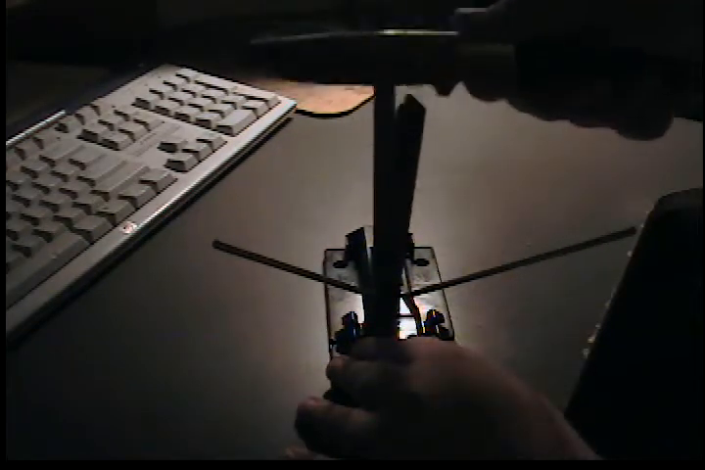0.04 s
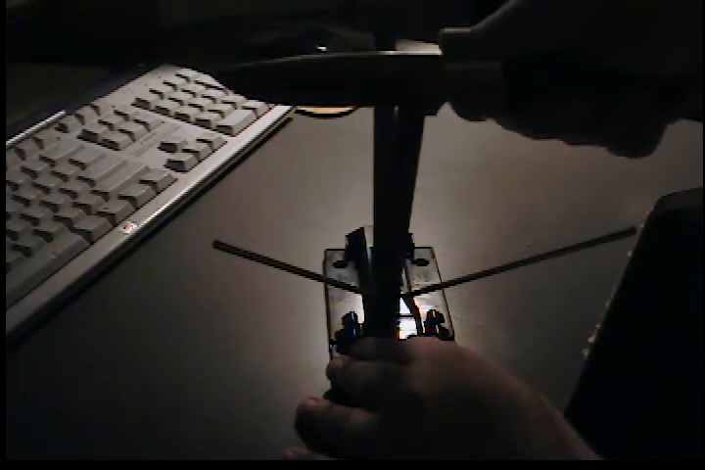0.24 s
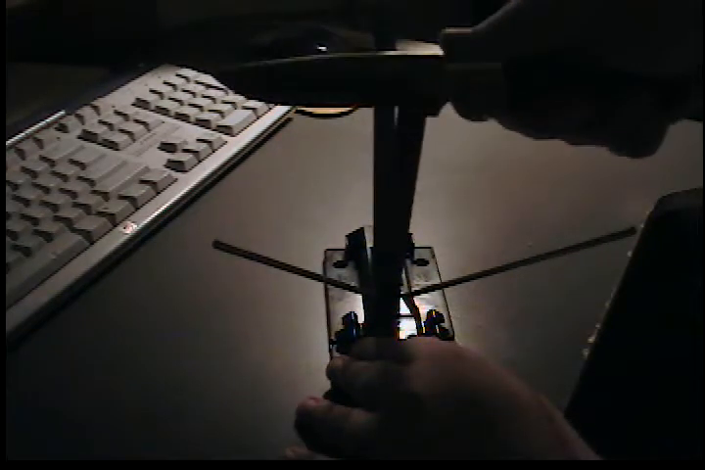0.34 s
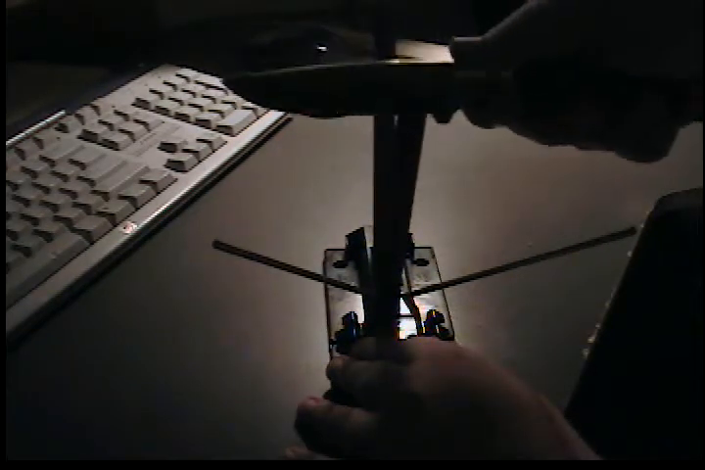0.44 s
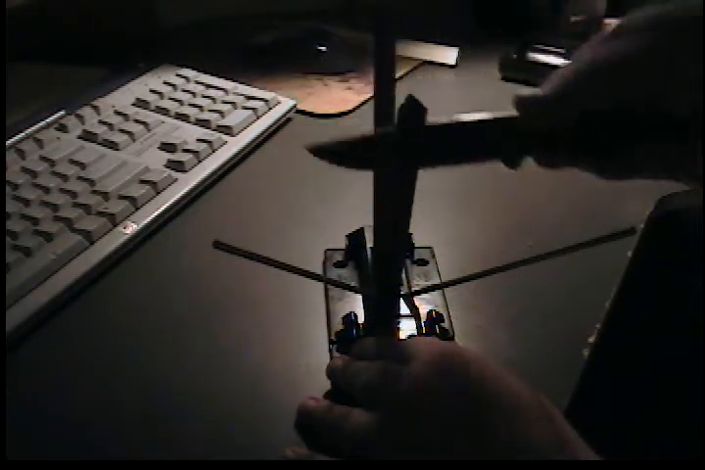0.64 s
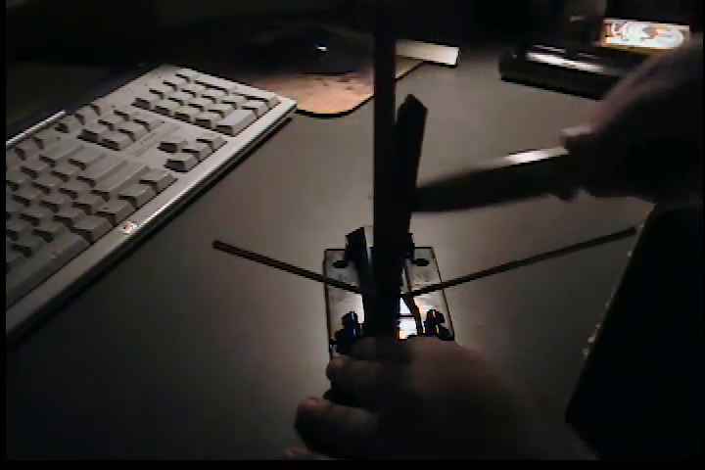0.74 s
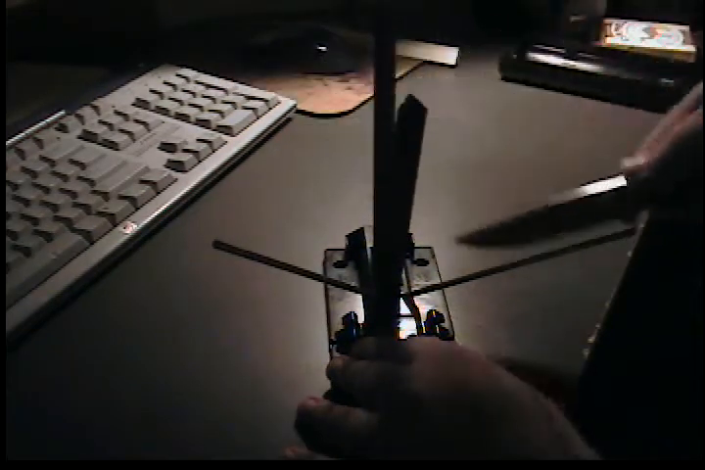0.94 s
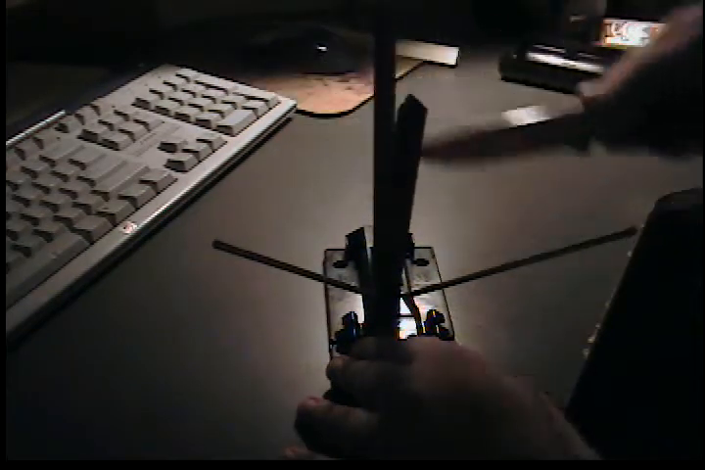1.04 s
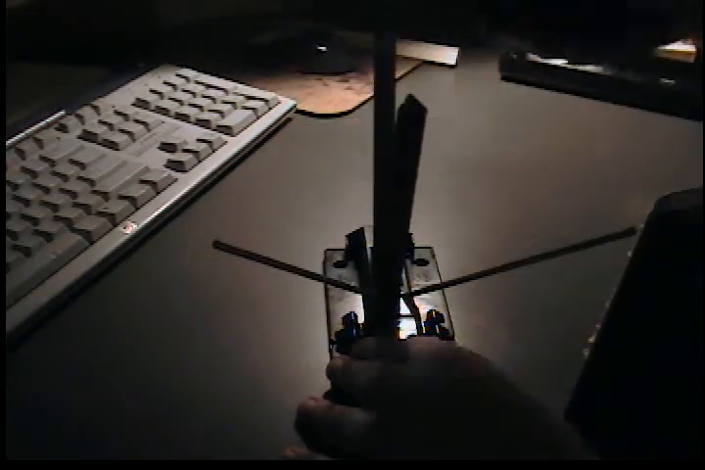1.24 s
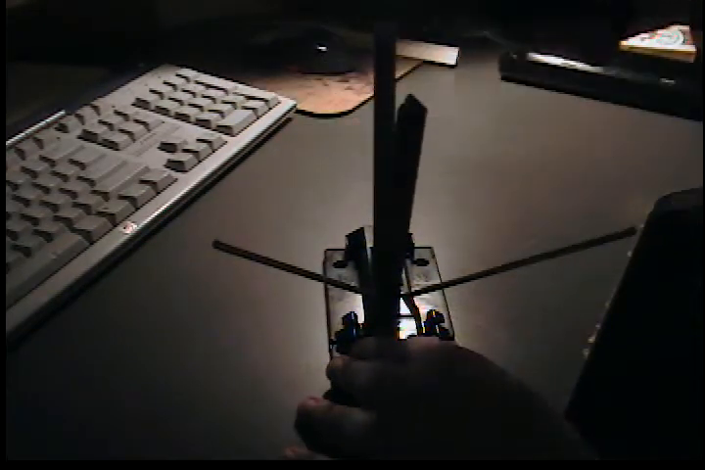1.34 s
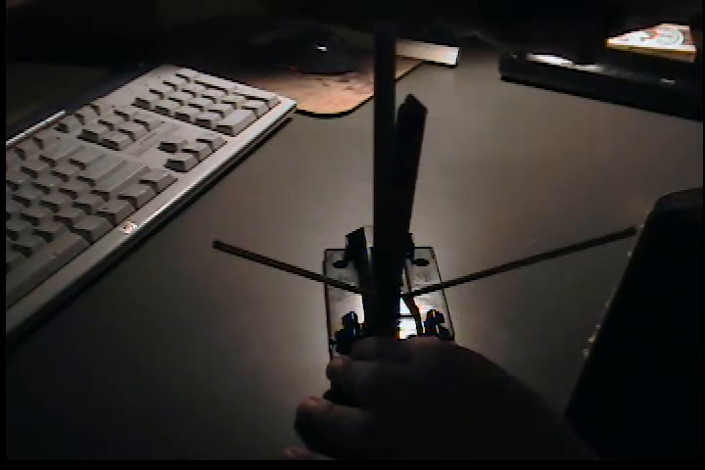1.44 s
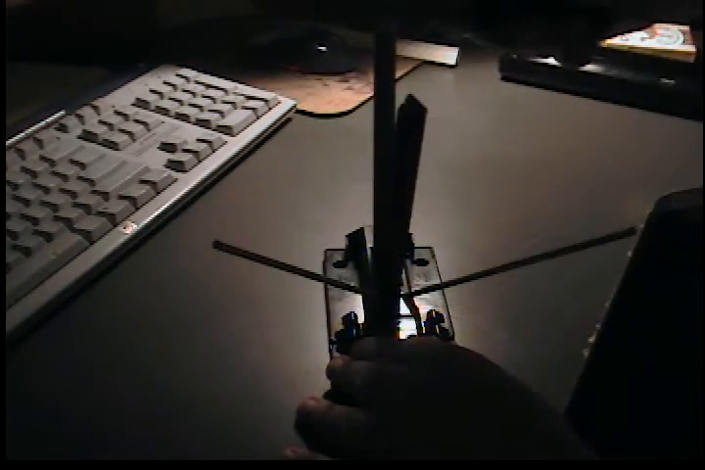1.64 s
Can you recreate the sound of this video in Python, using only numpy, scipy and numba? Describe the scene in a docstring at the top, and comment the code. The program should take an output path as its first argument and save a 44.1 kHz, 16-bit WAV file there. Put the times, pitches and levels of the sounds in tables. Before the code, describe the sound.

A knife blade scrapes once down a sharpening rod, rasping and ringing.

```python
"""A knife is drawn once down a sharpening rod held upright on a desk, in a small quiet room.
Friction on the rod's grain forces the steel to vibrate: a low rasp first, then hiss and brighter
ringing whose pitches bend as the contact runs to the tip. The blade lands with a clack before the
stroke and rings freely for a moment as the tip slips off. Later comes one faint knock on the desk."""
import sys
import numpy as np
from scipy import signal
from scipy.fft import rfft, irfft
from scipy.io import wavfile
from scipy.ndimage import uniform_filter1d
from numba import njit

SR = 44100
rng = np.random.default_rng(int(sys.argv[2]) if len(sys.argv) > 2 else 0)


def master_out(mix):
    """Clip the mix to full scale and print it as 16-bit PCM to the path in sys.argv[1]."""
    frames = np.transpose(np.atleast_2d(mix))
    ceiling = np.clip(frames, -1, 1)
    pcm = np.round(ceiling * 32767).astype(np.int16)
    wavfile.write(sys.argv[1], SR, pcm)


N = 74970
T = np.arange(N) / SR
FLICKER_HZ = 42.4   # bandwidth of the wavering of rubbed resonances


def from_db(db):
    """Amplitude ratio: a factor of ten for every 20 dB."""
    return 10 ** (np.asarray(db) / 20)


def rms_one(x):
    """Normalisation to unit mean power."""
    return x / np.sqrt(np.mean(x ** 2) + 1e-20)


def even(x, size=900):
    """Division by the running rms holds the short-term level near 1."""
    return x / np.sqrt(np.abs(uniform_filter1d(x * x, size)) + 1e-12)


def envelope(rows, fade_db_per_s=1000):
    """Gain interpolated in dB from rows (t/s, ..., level/dB), with exponential decay outside their span."""
    times, db = np.transpose(rows)[[0, -1]]
    outside_s = np.maximum(times[0] - T, 0) + np.maximum(T - times[-1], 0)
    return from_db(np.interp(T, times, db) - fade_db_per_s * outside_s)


def colour(x, spectrum):
    """Spectral shaping by rows (f/Hz, level/dB), at unit rms."""
    hz, db = np.transpose(spectrum)
    f = np.maximum(np.fft.rfftfreq(N, 1 / SR), 1)
    gain = from_db(np.interp(np.log(f), np.log(hz), db))
    return rms_one(irfft(rfft(x) * gain, N))


def band(x, low_hz, high_hz):
    """Band-pass filtering between two half-power frequencies."""
    return signal.sosfilt(signal.butter(2, [low_hz, high_hz], "band", fs=SR, output="sos"), x)


def drift(cutoff_hz):
    """Random modulation: low-passed noise at unit rms."""
    lowpass = signal.butter(2, cutoff_hz, fs=SR, output="sos")
    return rms_one(signal.sosfilt(lowpass, rng.standard_normal(N)))


@njit
def resonate(force, hz, width_hz):
    """A driven, damped oscillator whose natural frequency may vary in time."""
    out, state = np.zeros(len(force)), 0j
    damping = np.exp(-np.pi * width_hz / SR)
    for i in range(len(force)):
        state = state * damping * np.exp(2j * np.pi * hz[i] / SR) + force[i]
        out[i] = state.real
    return out


def ringing(force, hz, width_hz):
    """Forced response of one mode, its skirts filtered down, at unit rms."""
    response = resonate(force, hz * np.ones(N), float(width_hz))
    return rms_one(band(response, 0.906 * np.mean(hz), 1.3 * np.mean(hz)))


def impulses(rows):
    """Brief contacts idealised as impulses, one for each row (t/s, level/dB)."""
    force = np.zeros(N)
    for t, db in rows:
        force[int(t * SR)] += from_db(db)
    return force


def struck(force, modes):
    """Modal superposition: the force is convolved with damped sinusoids of alternating sign."""
    response = sum((-1) ** k * from_db(db - 60 * T / t60) * np.sin(2 * np.pi * hz * T)
                   for k, (hz, db, t60) in enumerate(modes))
    return signal.fftconvolve(force, response)[:N]


def burst(force, spectrum, decay_s):
    """Impact transient: coloured noise that decays exponentially after each impulse."""
    decay = signal.lfilter([1], [1, -np.exp(-1 / (decay_s * SR))], force + 1e-18)
    return colour(rng.standard_normal(N), spectrum) * decay


def background():
    """Stationary noise: a broadband floor, a low tonal hum and faint narrow-band whines."""
    # spectrum of the room noise: f/Hz, relative level/dB
    floor_spectrum = [(15, -30), (25, -13), (49, -11), (66, -8), (82, -8.5), (113, -3), (144, -10.5),
                      (188, -0.5), (274, -4.5), (389, -7.5), (495, -7.5), (598, -7.5), (848, -13),
                      (997, -11.5), (3630, -20), (7500, -25.5), (9300, -29), (12200, -30.5), (15500, -42.5)]
    # tones of the hum: f/Hz, rms level/dB
    hum_tones = [(60, -67.5), (118, -69), (191, -68)]
    # centres of the whines: f/Hz, rms level/dB
    whine_bands = [(2950, -75), (4870, -76.5), (7230, -77), (7795, -70.5), (8540, -74.5)]
    hum = sum(np.sqrt(2) * from_db(db) * np.sin(2 * np.pi * (hz * T + rng.random()))
              for hz, db in hum_tones)
    whines = sum(from_db(db) * ringing(rng.standard_normal(N), hz, width_hz=87) for hz, db in whine_bands)
    return from_db(-52.5) * colour(rng.standard_normal(N), floor_spectrum) + hum + whines


def room(direct, t60_s=0.21, delay_s=0.0017, top_hz=11100):
    """Reverberation: the diffuse field is a convolution with exponentially decaying noise."""
    tail = band(rng.standard_normal(N), 150, top_hz) * from_db(-60 * T / t60_s) * (T > delay_s)
    tail *= np.sqrt(2 * top_hz / SR / np.sum(tail ** 2))   # about unit gain in the passband
    return from_db(-11.5) * signal.fftconvolve(direct, tail)[:N]


def knock():
    """Impact excitation: a faint, rattling knock sets off the desk's low, damped modes."""
    # contacts with the desk: t/s, level/dB
    contacts = [(1.4891, -38.5), (1.4918, -43.5), (1.4985, -57)]
    # spectrum of the dull transient: f/Hz, relative level/dB
    knock_spectrum = [(60, -12), (250, 11.5), (600, -9), (1700, -0.5), (2600, -6), (3800, -7.5),
                      (6000, -13), (10000, -14), (16000, -41)]
    # modes of the desk: f/Hz, relative level/dB, T60/s
    desk_modes = [(205, -16, 0.063), (312, -11, 0.036), (460, -12.5, 0.1)]
    force = impulses(contacts)
    thud = band(struck(force, desk_modes), 170, 900)
    return burst(force, knock_spectrum, decay_s=0.0049) + thud


def landing():
    """Hard impact of steel on steel: a broadband crack and the damped modes of the pinned blade."""
    # the blade lands on the rod and bounces: t/s, level/dB
    bounces = [(0.2405, -32), (0.2411, -20.5), (0.24175, -23), (0.2446, -28), (0.2470, -27)]
    # modes of the pinned blade: f/Hz, relative level/dB, T60/s
    pinned_modes = [(560, -29, .03), (780, -29, .03), (1400, -4, .018), (1720, -3, .018), (1725, -23, .16),
                    (2020, -7, .014), (2700, -10, .02), (3020, -11, .016), (3450, -10, .022),
                    (3840, -24, .13), (4450, -13, .012), (6100, -12, .012), (7600, -21, .012),
                    (9900, -26, .012), (11080, -18, .016)]
    # spectrum of the crack: f/Hz, relative level/dB
    crack_spectrum = [(150, -9), (600, -6.5), (1000, -7), (1700, 1), (3500, 5), (6000, -4.5), (9000, -13),
                      (12000, -27), (15500, -36)]
    force = impulses(bounces)
    crack = burst(force, crack_spectrum, decay_s=0.0019)
    return struck(force, pinned_modes) + from_db(-9.5) * crack


def release(at_s=0.806, force_db=-38.5):
    """Free vibration: the tip leaves the rod and the blade rings at its natural frequencies."""
    # modes of the free blade: f/Hz, relative level/dB, T60/s
    free_modes = [(750, -8, .14), (1453, -9, .14), (2530, -7, .14), (4980, -13, .1), (6702, -15, .15),
                  (7133, -16, .17), (7714, -18, .17), (9755, -13, .11), (11075, -9, .11), (14095, 2, .085)]
    return struck(impulses([(at_s, force_db)]), free_modes)


def friction(grains_per_s=1800, spread_db=1.5):
    """Roughness excitation: the edge catches at random on the rod's grain, over smooth sliding noise."""
    sizes = from_db(spread_db * np.minimum(rng.exponential(1, N), 4))
    signs = rng.choice([-1, 1], N)
    caught = rng.random(N) < grains_per_s / SR
    return rms_one(rms_one(sizes * signs * caught) + 0.45 * rng.standard_normal(N))


def rubbed(force, modes, rise_per_s, brighten_db_per_oct_s=9, jitter=0.011):
    """Forced vibration of modes that waver and creep up in pitch, the upper ones gaining with time."""
    elapsed_s = T - 0.686   # the modes have their listed values at this moment of the stroke
    out = 0
    for hz, width_hz, db in modes:
        tilt_db = brighten_db_per_oct_s * np.log2(hz / modes[0][0]) * elapsed_s
        pitch = hz * (1 + rise_per_s * elapsed_s + jitter * drift(FLICKER_HZ))
        out = out + from_db(db + tilt_db) * ringing(force, pitch, width_hz)
    return even(out)


def rasp(force):
    """Low resonances filter the friction into a rasp and a hollow tone whose pitch climbs faster."""
    # lower modes of blade and rod: f/Hz, bandwidth/Hz, relative level/dB
    body_modes = [(1272, 170, -6), (1405, 260, 16), (1460, 94, -24), (1712, 86, 13.5), (1868, 53, 0.5),
                  (2155, 31, 0)]
    # envelope of the rasp: t/s, relative level/dB
    body_levels = [(0.352, -62), (0.367, -38), (0.395, -38), (0.42, -41.5), (0.465, -37), (0.515, -30.5),
                   (0.57, -32.5), (0.62, -34), (0.67, -36.5), (0.70, -35.5), (0.725, -40.5), (0.745, -35),
                   (0.79, -38.5), (0.808, -37), (0.82, -75)]
    # modes of the hollow tone: f/Hz, bandwidth/Hz, relative level/dB
    hollow_modes = [(643, 54, -4.5), (748, 81, 5), (933, 114, -4.5)]
    # envelope of the hollow tone: t/s, relative level/dB
    hollow_levels = [(0.35, -64), (0.39, -48.5), (0.44, -47), (0.56, -45), (0.595, -36.5), (0.66, -44),
                     (0.708, -33.5), (0.73, -48.5), (0.765, -43), (0.80, -48), (0.82, -49.5)]
    body = envelope(body_levels) * rubbed(force, body_modes, rise_per_s=0.082)
    hollow = envelope(hollow_levels) * rubbed(force, hollow_modes, rise_per_s=0.41)
    return from_db(-1) * body + from_db(-1.5) * hollow


def hiss(force):
    """Broadband friction noise from the edge, which also drives steady resonances of the steel."""
    # modes of the steel: f/Hz, bandwidth/Hz, relative level/dB
    steel_modes = [(2140, 55, 1), (2800, 60, -5), (3180, 50, -8), (3560, 60, -2), (4020, 90, -1),
                   (4400, 110, -5), (4990, 60, -8), (6700, 110, -4), (7130, 120, -3), (7700, 110, -5),
                   (8500, 180, -1), (9350, 140, -1)]
    # spectrum of the edge noise: f/Hz, relative level/dB
    edge_spectrum = [(300, -11), (1000, -11), (2000, 6.5), (3200, 4), (4400, -6.5), (5500, 2), (7200, -4.5),
                     (9000, -16), (10500, 6.5), (12500, 4), (14500, -22), (16000, -33)]
    # envelope of the hiss: t/s, relative level/dB
    hiss_levels = [(0.35, -75), (0.37, -62), (0.43, -67), (0.52, -57.5), (0.58, -44), (0.63, -36.5),
                   (0.70, -35.5), (0.74, -33.5), (0.785, -44), (0.802, -30.5), (0.814, -52)]
    steel = even(sum(from_db(db) * ringing(force, hz, width_hz) for hz, width_hz, db in steel_modes))
    edge = colour(force + friction(), edge_spectrum)
    return envelope(hiss_levels) * (from_db(-2.5) * steel + from_db(-4.5) * edge)


def bending_mode(force, track, width_hz=55.0, jitter=0.0043, flicker_db=3.33):
    """Mode splitting: a gliding blade resonance parts into a close pair where it is pressed hardest."""
    times, hz, _ = np.transpose(track)
    offset_hz = 108 * np.exp(-((T - 0.69) / 0.052) ** 2)
    pair = 0
    for side in (-1, 1):
        wander = 1 + jitter * drift(cutoff_hz=59)   # the contact wanders
        pitch = np.interp(T, times, hz) * wander + side * offset_hz
        pair = pair + resonate(force + friction(), pitch, width_hz)
    ring = even(band(pair, 0.78 * hz.min(), 1.22 * hz.max()), size=500)
    flicker = from_db(-1 + flicker_db * drift(FLICKER_HZ))
    return envelope(track) * flicker * ring


def stroke(chatter_db=0.95):
    """Friction drives the blade, while the contact, a moving constraint, retunes its bending modes."""
    # tracks of six bending modes, lowest first: t/s, f/Hz, relative level/dB
    bend_1 = [(0.37, 2550, -55), (0.395, 2400, -49), (0.44, 2510, -54), (0.52, 2443, -48.5),
              (0.62, 2486, -44.5), (0.71, 2434, -40.5), (0.76, 2460, -48), (0.792, 2580, -32.5),
              (0.808, 2580, -47.5)]
    bend_2 = [(0.37, 3950, -60), (0.44, 3980, -59), (0.52, 4050, -48), (0.61, 4100, -37), (0.64, 4000, -45),
              (0.665, 3740, -38), (0.695, 3760, -35), (0.725, 3620, -36), (0.755, 3800, -47),
              (0.775, 4100, -44), (0.805, 4400, -45)]
    bend_3 = [(0.43, 6750, -67), (0.49, 6900, -55), (0.52, 7080, -45), (0.565, 7280, -43), (0.6, 6950, -47),
              (0.63, 6350, -43), (0.665, 6300, -48), (0.71, 6650, -50), (0.74, 7000, -36),
              (0.765, 6750, -52), (0.805, 6800, -44)]
    bend_4 = [(0.38, 9450, -70), (0.46, 9600, -57), (0.51, 9750, -52), (0.56, 9760, -46), (0.59, 9550, -56),
              (0.65, 10050, -40), (0.664, 9500, -48), (0.68, 8750, -40), (0.7, 8500, -40),
              (0.712, 9400, -40), (0.755, 9850, -44), (0.805, 9500, -42)]
    bend_5 = [(0.37, 11080, -65), (0.5, 11250, -59), (0.56, 11100, -58), (0.578, 11250, -42),
              (0.61, 11400, -46), (0.64, 11050, -46), (0.665, 11350, -37), (0.705, 11150, -45),
              (0.73, 11600, -32), (0.748, 11250, -43), (0.77, 11700, -36), (0.79, 11250, -46),
              (0.805, 11050, -38)]
    bend_6 = [(0.4, 14200, -73), (0.52, 14500, -66), (0.585, 14900, -58), (0.61, 14300, -56),
              (0.645, 14750, -49), (0.7, 14250, -54), (0.735, 14850, -47), (0.77, 14250, -49),
              (0.805, 14100, -47)]
    force = friction()
    singing = sum(bending_mode(force, track) for track in (bend_1, bend_2, bend_3, bend_4, bend_5, bend_6))
    chatter = from_db(chatter_db * drift(cutoff_hz=55))
    return (rasp(force) + singing + hiss(force)) * chatter


def scene():
    """Superposition of direct sound, reverberation and background in one channel."""
    direct = landing() + stroke() + release() + knock()
    return (direct + room(direct) + background())[None]


def record(dry, cutoff_hz=15600):
    """Band limiting: a steep elliptic low-pass removes the highest treble."""
    return signal.sosfilt(signal.ellip(10, .2, 70, cutoff_hz, fs=SR, output="sos"), dry)


dry = scene()
out = record(dry)
master_out(out)
```